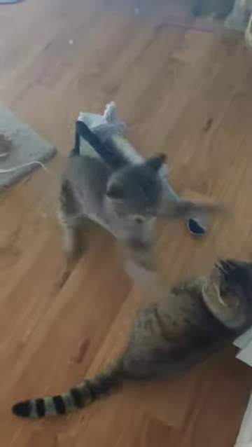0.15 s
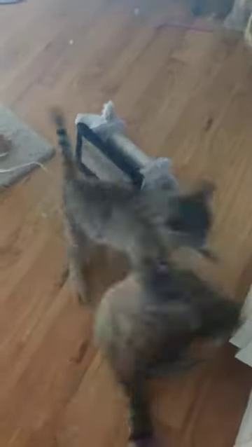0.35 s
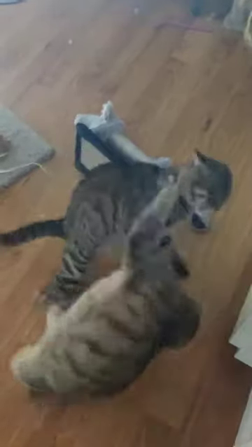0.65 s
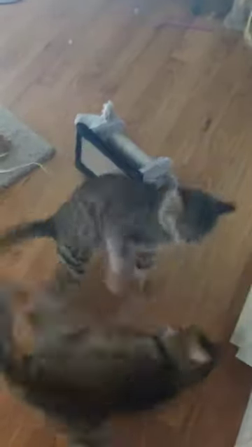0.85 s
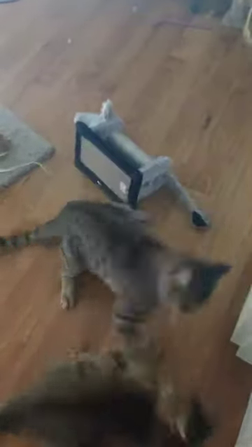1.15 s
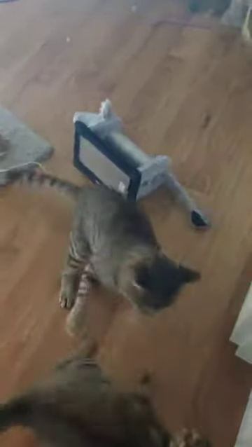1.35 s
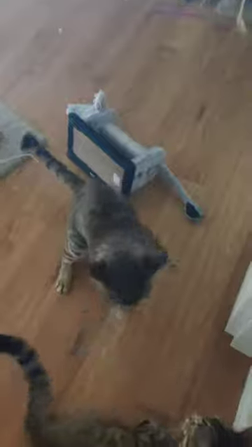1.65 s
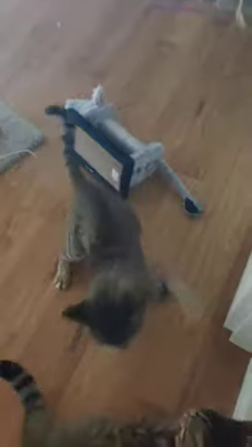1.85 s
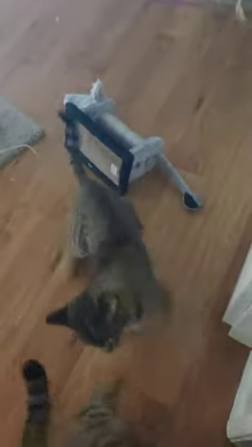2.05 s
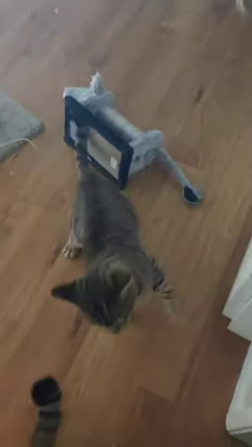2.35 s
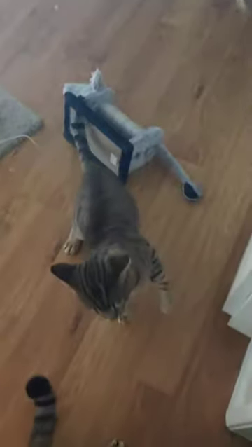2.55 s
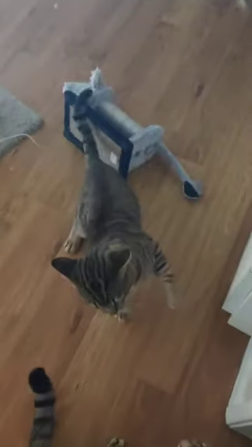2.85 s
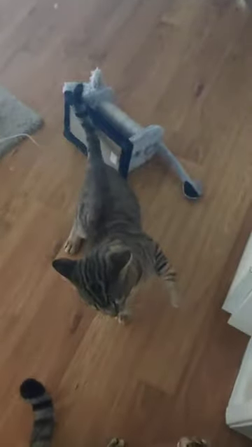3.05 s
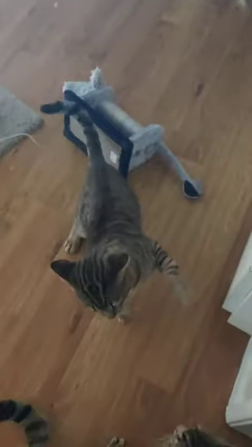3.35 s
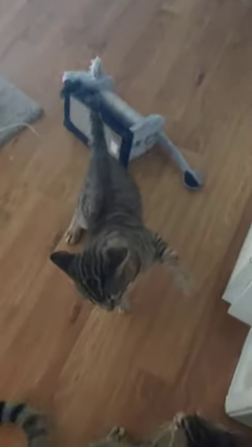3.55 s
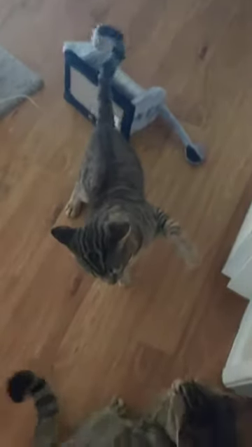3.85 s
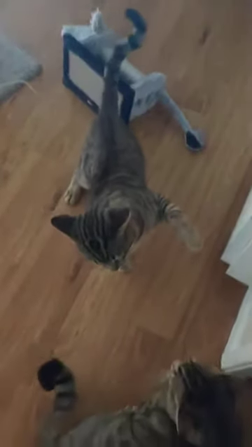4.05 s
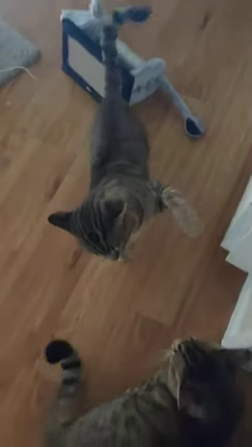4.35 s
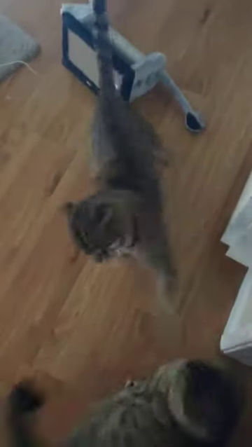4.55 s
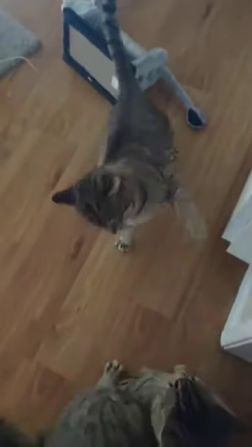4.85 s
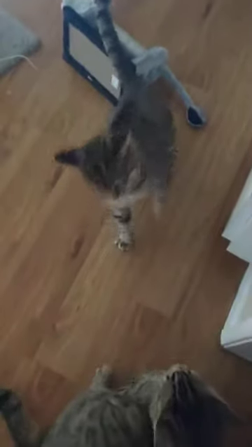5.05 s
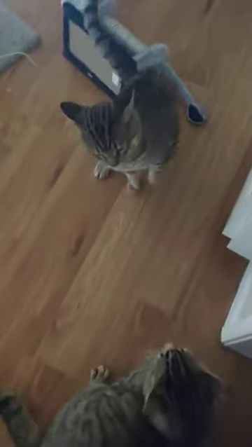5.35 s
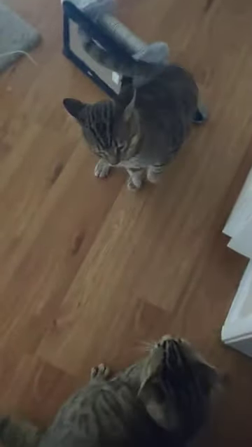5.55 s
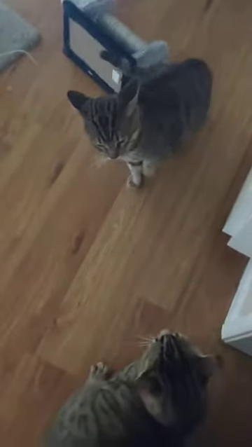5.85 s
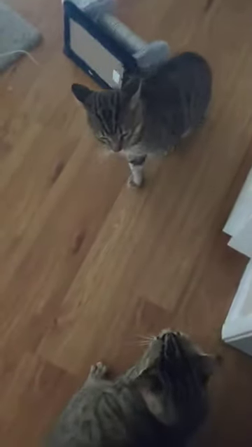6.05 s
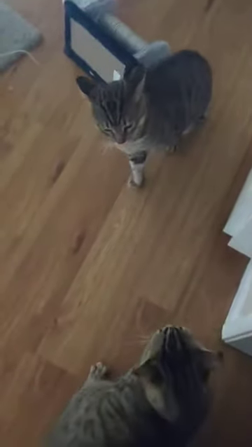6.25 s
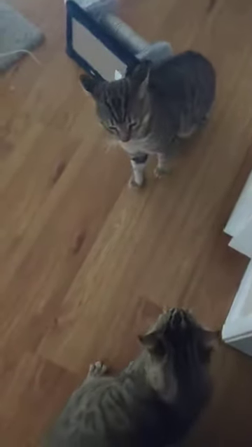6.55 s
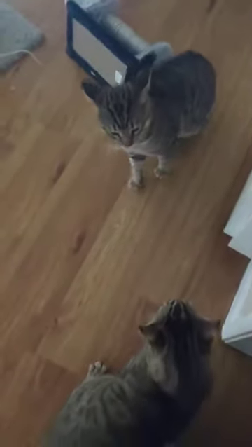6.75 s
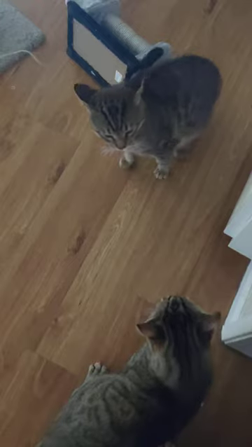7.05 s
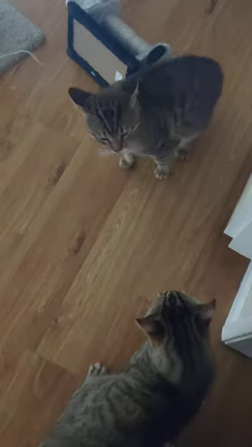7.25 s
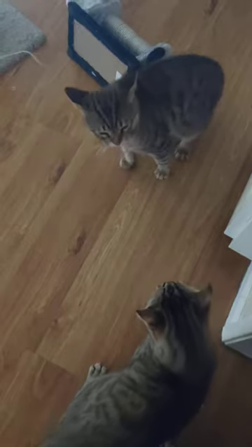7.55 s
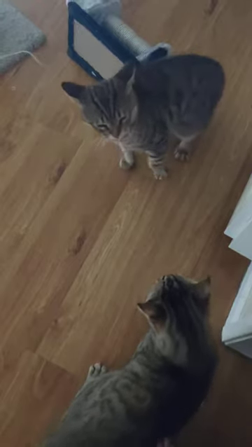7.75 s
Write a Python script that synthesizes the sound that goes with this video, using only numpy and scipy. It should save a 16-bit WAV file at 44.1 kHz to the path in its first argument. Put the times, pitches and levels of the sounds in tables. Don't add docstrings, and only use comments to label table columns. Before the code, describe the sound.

A phone close to two fighting cats picks up a fading hoarse moan, then a sudden tumble of booming thuds, slaps and scraping claws on wood. A breathy hiss follows, with light paw pats and scratches trailing off. A loud, nasal yowl lasts about three seconds, its voice breaking twice, before quiet room air and a few small hard clacks. Short bright echoes surround everything.

```python
import sys
import numpy as np
from scipy import signal
from scipy.fft import rfft, irfft, next_fast_len
from scipy.io import wavfile
from scipy.ndimage import uniform_filter1d

SR = 44100
rng = np.random.default_rng(int(sys.argv[2]) if len(sys.argv) > 2 else 0)


def volts(x):
    e = np.asarray(x, float) / 20
    return 10 ** e


def file_out(sig):
    cols = np.atleast_2d(sig).T
    lim = np.clip(cols, -1, 1)
    pcm = np.round(lim * 32767).astype(np.int16)
    wavfile.write(sys.argv[1], SR, pcm)


N = 347949

# pitch_hz, level_db (per Hz)
AIR_COLOUR = [(12, -22), (20, 5.5), (59, -22), (85, -7), (275, -6), (344, -17), (407, -7), (553, -13.5),
              (751, -12.5), (888, -28), (965, -19.5), (1310, -28), (2490, -30), (15700, -40.5)]
# pitch_hz, width_hz, level_db, start_s, end_s
HUMS = [(91.4, 4, -57.5, 4.7, 15), (407, 1.06, -61.5, 6.1, 7.0), (142, 5.2, -66, 0.53, 5.1),
        (770, 26, -57.5, 6.66, 6.75), (550, 44, -49, 7.7, 7.9)]
# pitch_hz, likeness (0-1)
PORT_LIKENESS = [(60, 0.87), (180, 0.99), (550, 0.582), (1650, 0.02), (5000, 0.056), (15000, .01)]
# pitch_hz, left_minus_right_db
PORT_LEAN = [(60, 1), (180, 2), (550, -4), (1650, 1.5), (4970, -3), (15000, -6.5)]
# pitch_hz, t60_s
ROOM_DECAY = [(200, 0.058), (550, .45), (1000, 0.52), (2500, 0.7), (5000, 0.42), (14000, 0.05)]

# peak_s, rise_s, fall_s, level_db, lowest_db (against level_db)
RUMBLE = [(0, .1, 2.45, -47.5, 3), (0.332, 0.025, 0.96, -22.5, -30), (.6, 0.4, 2.6, -39.5, -1),
          (1.0, 0.35, 0.26, -33.5, -8), (1.751, 0.067, 0.16, -66, -23), (2.08, 0.17, 1.6, -49.5, -8.5),
          (4.631, 0.34, 1.1, -44.5, -2.5), (6.36, 0.9, 0.043, -49, -8.5), (6.7, 0.19, 0.84, -75.5, -4.5),
          (7.2, 0.28, 0.86, -50, -25), (7.89, 1, 1., -48, -6)]
# start_s, level_db, board_hz, t60_s
THUDS = [
    (0.333, -4, 239.5, 0.14),
    (0.433, -12.5, 248, 0.19),
    (0.507, -8.5, 103, 0.11),
    (0.539, -24, 212, 0.095),
    (1.237, -29, 158, 0.16),
    (7.194, -38, 107, 0.34),
]
# peak_s, level_db, width_s
SLAPS = [
    (.417, -18, 0.0006),
    (0.506, -13, .001),
    (.616, -22, 0.00025),
]
# start_s, level_db
CLACKS = [
    (7.142, -35.5),
    (7.202, -24),
    (7.212, -34),
    (7.222, -24.5),
]
# pitch_hz, level_db, t60_s
CLACK_MODES = [(823, 4, 0.025), (520, 4, .03), (1330, 2, 0.04), (1460, 0, .03), (1780, -4, 0.013),
               (3950, -5, 0.04), (4520, -4.5, 0.015), (5505, 0, 0.009), (6100, -2, .01), (6806, 1, 0.025)]
# start_s, level_db, ring_hz, pan_db
KNOCKS = [
    (0.316, -23.5, 1202, 4.5),
    (0.331, -14.5, 1390, 9),
    (.614, -25, 3000, -6),
    (2.066, -23.5, 770, 2),
    (6.68, -57, 760, -0.5),
]
# start_s, level_db, ring_hz, pan_db
PATS = [
    (1.237, -31.5, 556, -1),
    (1.236, -49, 1500, 0),
    (1.335, -42, 1450, 8),
    (1.433, -37.5, 1350, 9.5),
    (1.532, -44, 1390, -3),
    (7.183, -46, 660, -1.5),
]
# start_s, level_db, pan_db
CLAW_TIPS = [(.228, -44, -8), (.3288, -12, -13), (.47, -36, -10), (.487, -38, -10), (.602, -31, -10),
             (.616, -23, -12), (.802, -30, -10), (.968, -18, -10), (1.321, -27, -9), (1.325, -26, -11),
             (1.6117, -63, -12), (1.8034, -49, -9), (2.1037, -25, -7.5), (2.2962, -38, -10),
             (2.389, -39, 1), (4.6452, -16.5, -15), (4.652, -23, -9)]
# start_s, level_db, pan_db
CLAW_CATCHES = [(.782, -16, 2), (1.2695, -35, -7), (1.2998, -32, -2), (1.3285, -24, 7.5), (1.8724, -45, -1),
                (2.0133, -35, -10), (2.025, -36, -6), (2.0445, -33, -14), (2.0586, -28.5, -9),
                (2.0717, -28, -6), (2.0894, -31, -2), (2.1504, -43, 14.5), (2.187, -32, -4),
                (2.6184, -39, -3), (2.6424, -46, -7), (2.7003, -43, -1), (4.6452, -20, -3),
                (4.8998, -35, -11), (4.948, -31.5, -15)]

# peak_s, rise_s, fall_s, level_db, brightness_db
SCUFFLE = [(0.329, 0.0029, 0.14, -25.5, -7.5), (.4, 0.11, 0.4, -36, -13), (.47, 0.36, .15, -45.5, -3),
           (.55, .1, 0.75, -41, 5), (0.619, 0.23, .09, -40.5, 8), (.72, 0.16, 0.37, -43, 8),
           (1.25, 1, 0.18, -55.5, -6.5), (1.334, 0.11, 0.3, -46, 5), (2.062, 0.015, 0.53, -46, 5),
           (2.216, 0.3, 0.23, -50.5, 5.5), (2.624, 0.066, 0.41, -61, 2), (6.27, 0.15, 0.21, -55, -15),
           (7.62, 0.17, 2.7, -65, 14), (7.89, 0.56, 1., -48.5, -3)]
# peak_s, rise_s, hold_s,
# fall_s, level_db
FLICKS = [
    (.3, .3, 0.009, 0.034, -70),
    (3.3, .05, 2.75, 0.084, -71.5),
    (4.642, 0.012, .005, 0.31, -36),
    (4.72, .05, 0.011, 0.26, -43),
    (4.947, .03, 0.24, 0.13, -50),
    (6.258, 0.092, 0.078, 0.074, -72),
]
# time_s, breath_db, mouth_hz, teeth_edge_db
HISS = [(.665, -52, 3300, 12), (.685, -31, 3370, 9.5), (.735, -27.5, 3500, 3), (.775, -23.5, 3120, 0),
        (.80, -26, 3230, -2.5), (.835, -20.5, 3370, -1), (.87, -25.5, 3400, -3), (.96, -24, 3360, -3),
        (1.04, -32, 3500, -2), (1.1, -39.5, 3380, 1.5), (1.251, -64, 3250, 0.5)]
# pitch_hz, level_db (per Hz)
HISS_COLOUR = [(240, -41), (400, -6.5), (774, -4.5), (1150, -6), (1920, -12), (2600, -5.5), (3380, 3.5),
               (4300, -6.5), (5200, -2), (6700, -5.5), (9310, -11.5), (15700, -5)]
# pitch_hz, share (0-1)
TEETH = [(4300, 0), (5500, 1), (7000, 1), (9000, .3)]

# time_s, pitch_hz
MOAN_PITCH = [(0, 318.6), (.05, 301.6), (.1, 289.3), (.16, 283.9), (.22, 279.2), (.3, 273)]
RISE_PITCH = [(3.218, 545), (3.24, 590), (3.264, 630), (3.298, 548), (3.316, 553), (3.338, 595),
              (3.39, 614), (3.428, 597), (3.496, 626), (3.582, 613)]
STRAINED_PITCH = [(3.6, 580), (3.64, 583), (3.668, 601), (3.8, 592), (3.84, 604), (3.96, 606)]
HELD_PITCH = [(3.984, 626), (4.04, 613), (4.26, 616), (4.53, 609), (4.576, 633), (4.64, 635.5)]
CRACKED_PITCH = [(4.635, 690), (4.655, 770), (4.708, 600), (4.73, 605), (4.79, 573), (4.885, 554),
                 (4.97, 542), (5.08, 542.5), (5.126, 549)]
WAIL_PITCH = [(5.15, 539), (5.2, 536.5), (5.32, 540.5), (5.43, 536), (5.64, 538.5), (5.76, 557),
              (5.87, 559.5), (5.985, 557), (6.1, 520)]
SOB_PITCH = [(6.092, 540), (6.115, 571.6), (6.2, 582), (6.225, 600)]
# time_s, effort_db, mouth_opening (0-1), twang_db (back of the throat)
MOAN_PHRASE = [(0, -26, 0.15, -13.5), (.08, -32.5, 0.18, -9), (.16, -32.5, 0.14, -16), (.22, -39, 0.19, -6),
               (.3, -59, 0.27, -26)]
RISE_PHRASE = [(3.218, -53.5, 0.02, -32), (3.25, -42, 0, -25), (3.268, -32, .05, -23),
               (3.287, -28, 0.17, -8), (3.42, -31.5, 0.57, -7.5), (3.57, -23.5, 0.61, -7)]
STRAINED_PHRASE = [(3.6, -24.5, 0.7, -6.5), (3.78, -21, 0.81, -9), (3.915, -25, 0.67, -2.5),
                   (3.954, -14, 1, -16)]
HELD_PHRASE = [(3.984, -22.5, 0.6, -2.5), (4.05, -22, 0.56, -5), (4.27, -23, 0.57, -9),
               (4.458, -23.5, 0.38, -8.5), (4.54, -21, 0.55, -3), (4.6, -18, 0.55, -8),
               (4.64, -22, 0.59, -17.5)]
CRACKED_PHRASE = [(4.635, -30, .3, -22), (4.683, -24.5, 0.17, -12.5), (4.705, -16, 0.17, -11),
                  (4.74, -19.5, 0.16, 0), (4.84, -18.5, 0.13, -1.5), (4.95, -21, 0.31, 1),
                  (5.04, -18.5, 0.31, 2), (5.13, -23, 0.36, -3.5)]
WAIL_PHRASE = [(5.165, -19.5, 0.23, -3.5), (5.3, -22.5, 0.28, -5), (5.44, -22, 0.25, -7.5),
               (5.62, -21.5, 0.32, -8.5), (5.701, -26.5, 0.48, -2), (5.77, -23.5, 0.19, -2.5),
               (5.92, -24, 0.4, -2.5), (5.97, -21.5, 0.13, -3), (6.03, -24, 0.23, -6),
               (6.065, -17.5, 0.033, -17), (6.085, -24.5, 0.035, -15), (6.108, -21.5, 0.043, -16.5)]
SOB_PHRASE = [(6.092, -17, 0.15, -14), (6.13, -34, 0.16, -14), (6.165, -47, .1, -8), (6.205, -52, .1, -18),
              (6.222, -88, .1, -18)]
# centre_s, half_length_s, added_hoarseness (0 = none, 1 = very hoarse)
CRACKS = [
    (.25, .55, 1.25),
    (3.28, .1, .26),
    (3.42, .25, .1),
    (3.75, .3, .07),
    (4.02, .06, .27),
    (4.665, .04, .4),
    (4.9, .26, .09),
    (6.06, .06, .1),
    (6.24, .14, .6),
]
# pitch_hz, level_db
THROAT = [(400, -7.5), (2500, -0.5), (2900, -4), (3600, -1.5), (4150, -6.5), (4850, 7), (5500, -1),
          (6100, -17), (7000, -20), (8000, -16), (9300, -48.5), (12300, -28), (13500, -26.5), (15000, -23)]
# time_s, size_factor, fifth_partial_db, top_db
TONGUE = [(0, 1.08, 1.5, -5.5), (3.2, 0.97, -9, -0.5), (3.55, 1.034, 0, -3), (3.9, 1, 3.5, -1),
          (4.2, 1.073, 6.5, -2.5), (4.45, 0.99, 2, 4.5), (4.63, 0.99, 1, -3.5), (4.75, 1.03, -2.5, 2.5),
          (5.0, 0.95, -6.5, -7.5), (5.2, 0.97, -3, 2.5), (5.45, 0.975, -7, 5.5), (5.6, 0.97, 3.5, 6.5),
          (5.75, 0.96, 10.5, 8.5), (5.95, 0.94, 4, 7.5), (6.05, 1, -6.5, 0.5), (6.3, 0.72, -6.5, 16)]
# start_s, end_s, cut_db (upper partials)
MUFFLED = [
    (3.18, 3.3, 7.5),
    (4.614, 4.719, 4),
]
# start_s, end_s, crest_s, rate_hz, depth_db
TREMORS = [
    (3.628, 3.901, 3.812, 30.1, 3.5),
    (4.174, 4.358, 3.9, 19.3, 2),
]
# time_s, share (0-1)
YOWL_RASP = [(4.66, 0), (4.72, .75), (5.0, .78), (5.12, .55), (5.17, .15), (6.0, .22), (6.2, 0)]
MOAN_RASP = [(0, 0.73), (.1, 0.23), (.22, .25), (.3, 0)]
# pitch_hz, left_minus_right_db
VOICE_LEAN = [(500, 2), (1150, -8), (1450, -5.5), (1750, 11.5), (2050, 0), (2400, -4), (3500, -2),
              (5000, -5)]


def evened(x):
    return x / np.sqrt(np.mean(x ** 2) + 1e-20)


def read(points, hz):
    f, value = np.transpose(points)
    return np.interp(np.log(hz + 1), np.log(f + 1), value)


def add(mix, s, sound):
    part = mix[..., max(round(s * SR), 0):][..., :sound.shape[-1]]
    part += sound[..., :part.shape[-1]]


def drift(count, size):
    return evened(uniform_filter1d(uniform_filter1d(rng.standard_normal(count), size=size), size=size))


def window(t, start, end, fade):
    return np.clip(np.minimum(t - start, end - t) / fade, 0, 1)


def swell(t, s, rise, hold, fall, db):
    return db - 30 * (np.maximum(s - t, 0) / rise + np.maximum(t - s - hold, 0) / fall)


def resonate(x, hz, width):
    turn = np.exp(2j * np.pi * hz * np.arange(len(x)) / SR)
    r = np.exp(-np.pi * width / SR)
    return 2 * (turn * signal.lfilter([1 - r], [1, -r], x / turn)).real


def band_noise(hz, width, second_width):
    return evened(resonate(resonate(rng.standard_normal(N), hz, width), hz, second_width))


def lowpass(x, hz):
    return signal.oaconvolve(x, signal.firwin(255, hz, fs=SR)[None], "same")


def noise(shape_db, size, patchy_db, flicker_db):
    hop = size // 4
    t, hz = np.arange(N // hop + 5) * hop / SR, np.fft.rfftfreq(size, 1 / SR)
    a, b, c, d, patch = rng.standard_normal((len(t), len(hz), 5)).T
    patch = evened(uniform_filter1d(uniform_filter1d(patch, size=7, axis=0), size=9, axis=1))
    flicker = rng.standard_normal(len(t))
    same = read(PORT_LIKENESS, hz)[:, None]
    left = a + 1j * b
    right = same * left + np.sqrt(1 - same ** 2) * (c + 1j * d)
    lean = read(PORT_LEAN, hz)[:, None] / 2
    z = np.array([left, right]) * volts(np.array([lean, -lean]))
    z *= volts(shape_db(hz, t) + patchy_db * patch + flicker_db * flicker)
    return signal.istft(z, nperseg=size, noverlap=size - hop)[1][:, :N] * np.sqrt(SR / size)


def room(x):
    echoes = np.zeros((2, SR))
    at = np.arange(200, SR - 20, 20) + rng.integers(0, 20, (2, (SR - 201) // 20))
    np.put_along_axis(echoes, at, rng.choice([-1., 1.], at.shape), 1)
    hz, t, z = signal.stft(echoes, SR, nperseg=256)
    tail = signal.istft(z * volts(-60 * t / read(ROOM_DECAY, hz)[:, None]), SR, nperseg=256)[1]
    return signal.fftconvolve(x, tail / np.linalg.norm(tail[0]), axes=1)[:, :N]


def background():
    air = noise(lambda hz, t: read(AIR_COLOUR, hz)[:, None] + 0 * t, size=2048, patchy_db=2.2, flicker_db=.3)
    out, t = volts(-51.5) * evened(air), np.arange(N) / SR
    for hz, width, db, start, end in HUMS:
        hum = evened(resonate(rng.standard_normal(N), hz, width))
        out = out + volts(db) * window(t, start, end, 0.029) * hum
    throb = volts(1.5 * evened(uniform_filter1d(rng.standard_normal(N), size=1500)))
    whine = np.array([band_noise(2510, 200, 400) for port in range(2)])
    return out + volts(-70.5) * throb * whine


def spread(hz, centres_hz, levels_db):
    at = np.interp(np.log(hz + 1), np.log(centres_hz), np.arange(len(centres_hz)))
    return sum(np.clip(1 - abs(at - k), 0, 1)[..., None] * db for k, db in enumerate(levels_db))


def boards(hz, t):
    gestures = [(s, rise, 0, fall, db, lowest) for s, rise, fall, db, lowest in RUMBLE]
    gestures.append((3.5, 1.4, 3, 6, -49.5, -6.5))
    db = 10 * np.log10(sum(volts(2 * swell(t, *row[:5])) for row in gestures) + 1e-9)
    deep = 10 * np.log10(sum(volts(2 * (swell(t, *row[:5]) + row[5])) for row in gestures) + 1e-9)
    return spread(hz, [40, 100, 240, 420, 900], [deep - 15, db - 28.5, db - 30.0, db - 30.5, db - 54.5])


def thuds():
    out, t = np.zeros(N), np.arange(12000) / SR
    for s, db, hz, t60 in THUDS:
        add(out, s, volts(db - 60 * t / t60) * (1 - np.exp(-t / 0.02)) * np.sin(2 * np.pi * hz * t))
    return out


def slaps():
    out, t = np.zeros(N), np.arange(-200, 600) / SR
    for s, db, width in SLAPS:
        push = np.exp(-(t / width) ** 2)
        rebound = 0.2 * np.exp(-(t / (3 * width) - 1) ** 2)
        add(out, s - 200 / SR, volts(db) * (push - rebound))
    return out


def clacks():
    out, t = np.zeros(N), np.arange(8000) / SR
    ring = sum(volts(db - 60 * t / t60) * np.sin(2 * np.pi * hz * t) for hz, db, t60 in CLACK_MODES)
    ring *= 0.49 + np.exp(-t / 0.0052)
    ring *= 1 - np.exp(-t / 0.000099)
    for s, db in CLACKS:
        add(out, s, volts(db) * ring / abs(ring).max())
    return out


def taps(events, crack_s, width_hz, centre_hz=0):
    out, t = np.zeros((2, N)), np.arange(1500) / SR
    for s, db, *ring, pan in events:
        hz = centre_hz or ring[0]
        crackle = rng.standard_normal(1500) * np.exp(-t / crack_s)
        tick = resonate(resonate(crackle, hz, width_hz), hz, 2 * width_hz)
        add(out, s, volts(db) * tick / abs(tick).max() * volts(np.array([[pan / 2], [-pan / 2]])))
    return out


def claws_and_paws():
    claws = taps(CLAW_TIPS, 0.0016, 2200, 13900) + taps(CLAW_CATCHES, 0.0011, 3300, 6800)
    return claws + taps(KNOCKS, 0.0015, 2140) + taps(PATS, 0.0036, 480)


def sliding(hz, t):
    power = 0
    for s, rise, fall, peak_db, bright_db in SCUFFLE:
        mid, low, top = -31.5, -32 - 0.67 * bright_db, -42 + bright_db
        centres_hz = [150, 700, 2200, 3500, 7500, 9200, 12000]
        colour = read(list(zip(centres_hz, [low - 12, low, low - 3, mid, mid, top - 5, top])), hz)
        power = power + np.outer(volts(2 * colour), volts(2 * swell(t, s, rise, 0, fall, peak_db)))
    return power


def flicks(hz, t):
    colour = read([(5000, -8.5), (8000, -2.5), (12000, -10.5)], hz) - 41.5
    return np.outer(volts(2 * colour), sum(volts(2 * swell(t, *row)) for row in FLICKS))


def hiss(hz, t):
    when, level, mouth, edge = np.transpose(HISS)
    breath_db = np.interp(t, when, level, left=-99, right=-99)
    colour = read(HISS_COLOUR, np.outer(hz, 3380 / np.interp(t, when, mouth)))
    teeth = np.outer(read(TEETH, hz), np.interp(t, when, edge))
    return volts(2 * (colour + breath_db - 35 + teeth))


def rubbing(hz, t):
    return 10 * np.log10(hiss(hz, t) + sliding(hz, t) + flicks(hz, t) + 1e-30)


def rasp(share, hz, width, db):
    gusts = volts(0.88 * evened(uniform_filter1d(rng.standard_normal(N), size=500)))
    envelope = np.interp(np.arange(N) / SR, *np.transpose(share))
    return volts(db) * envelope * gusts * band_noise(hz, width, width)


def region_levels(t, hz, phrase, regions, hoarse, chest_db):
    effort_db, mouth, twang_db = phrase
    mouth_hz = 977 + (1956 - 977) * mouth
    power = []
    for k in regions[1:4]:
        through_mouth = 1 / (1 + ((k * hz - mouth_hz) / 296) ** 2) ** 2
        through_twang = volts(2 * twang_db) / (1 + ((k * hz - 2458) / 363) ** 2) ** 2
        power.append(through_mouth + through_twang)
    power = np.array(power)
    chest = -13 - 0.75 * (effort_db + 23) + 12.5 * hoarse + chest_db
    clean_share = 1 - np.interp(t, *np.transpose(YOWL_RASP))
    upper = -22.5 + 0.42 * twang_db + 20 * np.log10(clean_share)
    return (chest, *10 * np.log10(power / power.sum(0)), upper)


def voice(pitch, rows, regions, throat_size, chest_db):
    s, *columns = np.transpose(rows)
    t = np.arange(s[0], s[-1], 1 / SR)
    hz = uniform_filter1d(np.interp(t, *np.transpose(pitch)), size=300, mode="nearest")
    phrase = [np.interp(t, s, c) for c in columns]
    hoarse = .06 + sum(more * np.clip(2 - 2 * abs(t - at) / half, 0, 1) for at, half, more in CRACKS)
    levels = region_levels(t, hz, phrase, regions, hoarse, chest_db)
    turns = np.cumsum(hz * (1 + (0.0017 + 0.016 * hoarse) * drift(len(t), 300))) / SR
    muffled_db = sum(db * window(t, a, b, .03) for a, b, db in MUFFLED)
    when, *tongue = np.transpose(TONGUE)
    stretch, fifth_db, top_db = (np.interp(t, when, c) for c in tongue)
    out = np.zeros(len(t))
    for k in range(1, int(15600 / np.median(hz))):
        place = np.interp(k, regions, np.arange(5))
        db = sum(max(1 - abs(place - j), 0) * level for j, level in enumerate(levels))
        db = db + read(THROAT, k * hz / (throat_size * stretch)) - muffled_db * (k > 2)
        db = db + (fifth_db if k == 5 else top_db * (k > 7))
        db = db + (1.22 + 4.7 * np.minimum(hoarse, .3)) * drift(len(t), 560)
        height = k * hz / 2900
        blur = 0.02 + hoarse * (0.2 + .6 * height ** 3 / (1 + (height / 2) ** 6))
        gain = volts(db) / np.sqrt(1 + blur ** 2)
        out += gain * (1 + blur * drift(len(t), 40)) * np.cos(2 * np.pi * k * turns + .6 * k * k)
    out += volts(-38) * band_noise(1400, 520, 520)[:len(t)]
    for a, b, crest, rate, depth_db in TREMORS:
        out *= volts(depth_db * window(t, a, b, .03) * np.cos(2 * np.pi * rate * (t - crest)))
    opening = t - s[0] + (s[0] == 0)
    edge = np.clip(np.minimum(opening, s[-1] - t) / .008, 0, 1)
    return s[0], np.sqrt(2) * volts(phrase[0] - 3.5) * out * edge


def moan():
    out = rasp(MOAN_RASP, hz=4520, width=220, db=-54)
    add(out, *voice(MOAN_PITCH, MOAN_PHRASE, (3, 4.2, 5.3, 7.3, 10), .89, -20))
    return out


def yowl():
    out = rasp(YOWL_RASP, hz=5050, width=600, db=-45.5)
    add(out, *voice(RISE_PITCH + STRAINED_PITCH + HELD_PITCH, RISE_PHRASE + STRAINED_PHRASE + HELD_PHRASE,
                    (1, 2, 3, 4, 5.6), 1.0, -2))
    add(out, *voice(CRACKED_PITCH + WAIL_PITCH, CRACKED_PHRASE + WAIL_PHRASE, (1, 2, 3, 4, 6), 1.04, 2))
    add(out, *voice(SOB_PITCH, SOB_PHRASE, (1, 2, 3, 4, 5.6), 1.0, 5))
    return out


def facing(x):
    size = next_fast_len(N)
    lean = read(VOICE_LEAN, np.fft.rfftfreq(size, 1 / SR)) / 2
    return irfft(rfft(x, size) * volts(np.array([lean, -lean])), size)[:, :N]


def scene():
    rub = noise(rubbing, size=256, patchy_db=2.0, flicker_db=0.75)
    rumble = noise(boards, size=512, patchy_db=2.5, flicker_db=2.0)
    cat = moan() + yowl()
    ports = volts(4.0) * facing(np.array([np.roll(cat, 2), cat]))
    sideways = volts(-6) * room(cat[None])[0] * np.array([[1], [-1]])
    steady = lowpass(ports + volts(-10) * room(ports) + sideways + rub + rumble + background(), 15750)
    landings = thuds() + slaps()
    landings = landings + volts(-9) * room(landings[None])[0]
    hits = claws_and_paws() - clacks()
    hits = lowpass(hits + volts(-6) * room(hits), 16650)
    return steady + landings + hits


def roll_off(x):
    return signal.sosfilt(signal.butter(12, 17010, fs=SR, output="sos"), x)


def record(dry):
    return roll_off(dry)


dry = scene()
out = record(dry)
file_out(out)
```